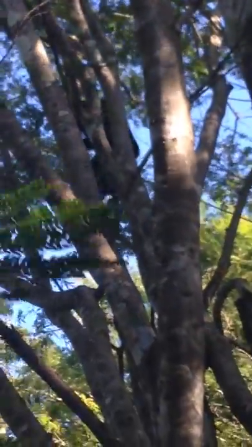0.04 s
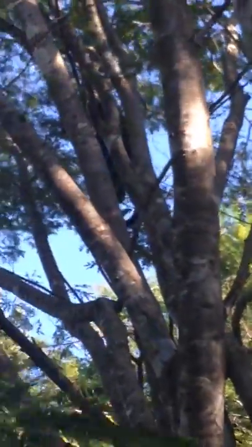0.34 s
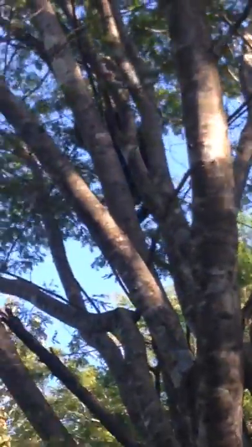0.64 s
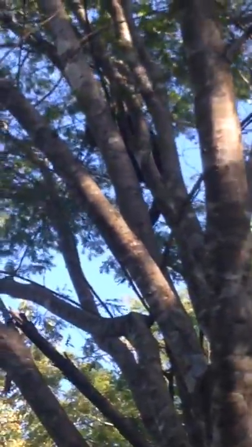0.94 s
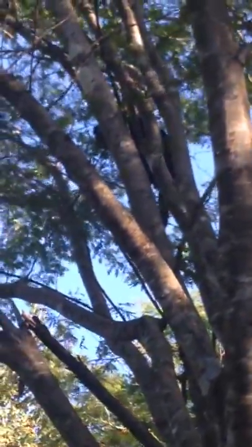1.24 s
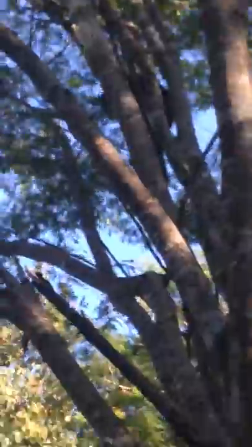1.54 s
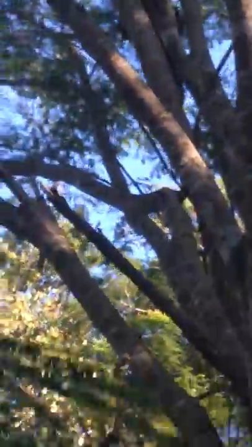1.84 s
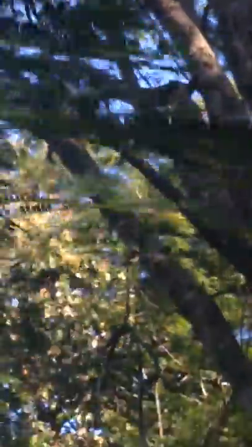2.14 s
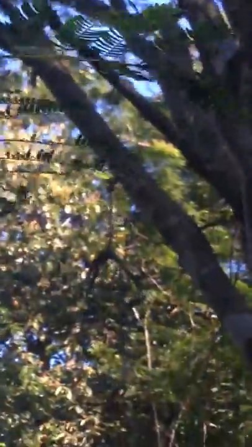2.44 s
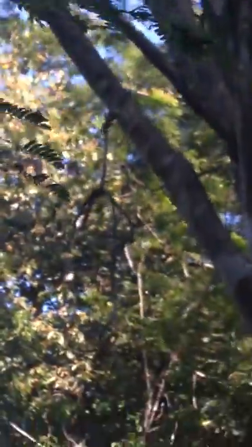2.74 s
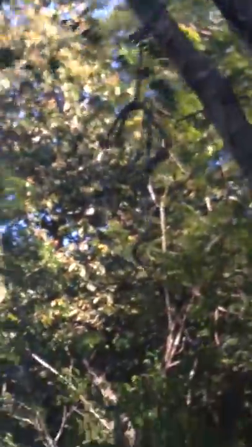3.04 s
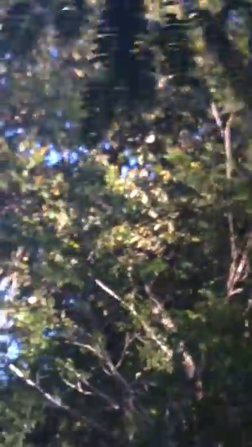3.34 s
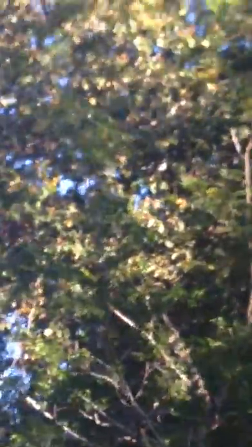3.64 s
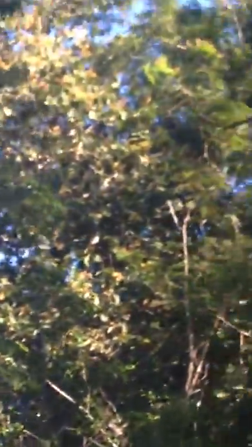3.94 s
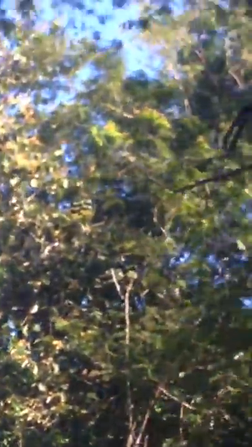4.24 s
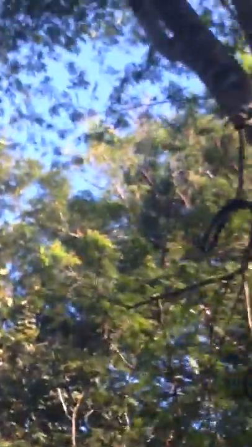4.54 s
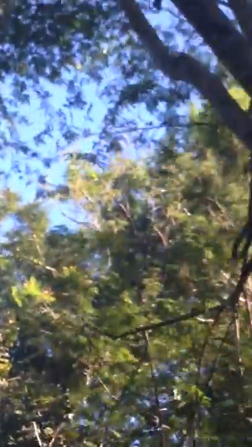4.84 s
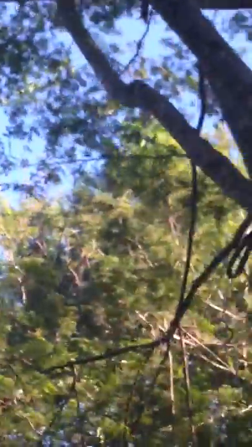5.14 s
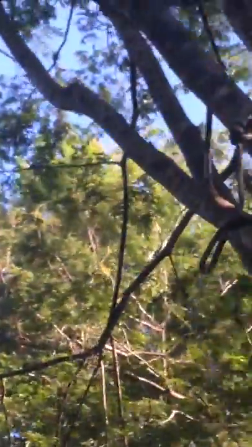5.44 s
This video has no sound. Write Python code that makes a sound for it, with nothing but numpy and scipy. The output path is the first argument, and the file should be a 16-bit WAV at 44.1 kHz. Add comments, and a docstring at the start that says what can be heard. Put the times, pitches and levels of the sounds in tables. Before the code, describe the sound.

A howler monkey calls from nearby treetops. It opens with a low growl carrying thin whines, then gives a few soft, spaced grunts. These turn into rough, breathy barks and finally loud, clear hoots, nearly three a second. Beneath the calls are a faint hiss of leaves and a low rumble, and a hand now and then bumps the microphone.

```python
"""A howler monkey in nearby treetops works up from soft grunts to loud hoots, nearly three a second; at the
start a second monkey growls and whines further off. Its uneven larynx pulses ring the throat sac and mouth; in
the loudest hoots the voice locks into a clear tone. Trees scatter the calls over a faint hiss of leaves and a
low rumble, and a hand bumps the camera now and then."""
import sys
import numpy as np
from scipy import signal
from scipy.fft import rfft, irfft
from scipy.io import wavfile
from scipy.ndimage import uniform_filter1d

SR = 44100
rng = np.random.default_rng(int(sys.argv[2]) if len(sys.argv) > 2 else 0)


def digitize_waveform(pressure):
    """Quantize a signal to 16-bit integers and store it at the path in sys.argv[1].

    Rows of a 2-D input are taken as channels; values are limited to [-1, 1].
    """
    field = np.atleast_2d(pressure).T
    bounded = np.clip(field, -1, 1)
    quanta = np.round(bounded * 32767).astype(np.int16)
    wavfile.write(sys.argv[1], SR, quanta)


N = 250929
TIME = np.arange(N) / SR


def undb(db):
    """Decibels to gain."""
    return 10 ** (np.asarray(db) / 20)


def unit(x):
    """Scale to rms 1."""
    return x / np.sqrt(np.mean(x ** 2))


def ramp(x):
    """Clip to 0-1."""
    return np.clip(x, 0, 1)


def steady(x, span_s):
    """Scale to local rms 1; faster flutter stays."""
    size = max(int(span_s * SR), 8)
    return x / np.sqrt(uniform_filter1d(uniform_filter1d(x ** 2, size), size) + 1e-12)


def walk(rate_hz):
    """Smooth random wander, rms 1."""
    size = int(SR / rate_hz)
    steps = np.repeat(rng.standard_normal(N // size + 1), size)
    return unit(uniform_filter1d(steps, size)[:N])


def noise(spectrum):
    """Noise shaped by (f/Hz, level/dB) points."""
    hz, db = np.transpose(spectrum)
    bins_hz = np.maximum(np.fft.rfftfreq(N, 1 / SR), 1)
    gain = undb(np.interp(np.log(bins_hz), np.log(hz), db))
    return irfft(rfft(rng.standard_normal(N)) * gain, N)


def tone(hz, waver):
    """Sine of rms 1; pitch trembles by the fraction waver."""
    cycles = np.cumsum(hz * (1 + waver * walk(120))) / SR
    return unit(np.sin(2 * np.pi * cycles))


def resonate(x, modes, stages=3):
    """Parallel resonances, each cascaded for steep skirts; widths are per stage."""
    out = 0
    for hz, width_hz, db in modes:
        section = np.concatenate(signal.iirpeak(hz, hz / width_hz, fs=SR))
        out = out + undb(db) * signal.sosfilt([section] * stages, x)
    return out


def latest_call(calls):
    """Per sample: age of the latest call, then its other columns."""
    rows = np.asarray(calls)
    latest = np.maximum(np.searchsorted(rows[:, 0], TIME, side="right") - 1, 0)
    start_s, *columns = rows[latest].T
    return TIME - start_s, *columns


def envelope(age_s, length_s, swell_s, swell_db, fade_s, fade_db, attack_s=0.0045, release_s=0.0065):
    """Call gain: attack, swell, hold, fade, release."""
    left_s = length_s - age_s
    gate = ramp(age_s / attack_s) * ramp(1 + left_s / release_s)
    return gate * undb(-swell_db * ramp(1 - age_s / swell_s) - fade_db * ramp(1 - left_s / fade_s))


# Breeze: t/s, hiss gain/dB, rumble gain/dB
BREEZE = [(0, -0.5, 6), (.6, 0.5, 0), (1.2, 1.8, 0.5), (2.4, 0.9, -2), (3.2, 0.7, 4), (4.1, 0.5, 3),
          (5.69, 1.2, 1.5)]
# Foliage and rumble spectra: f/Hz, level/dB
LEAF_SPECTRUM = [(590, -40), (1000, -6), (1200, -0.5), (1300, -1.5), (1450, -3), (2000, -1.5), (2340, -0.5),
                 (2970, -4), (3250, -1.5), (4220, -2), (5050, -2), (5600, -2), (15000, -12)]
RUMBLE_SPECTRUM = [(18, -36), (30, -3.5), (84, -2.5), (111, -6.5), (157, -10.5), (724, -25.5), (791, -24),
                   (1000, -28), (1300, -47.5), (2200, -120)]


def leaves(hiss_db=-62, rumble_db=-58, flutter_db=0.25, gust_db=1.5):
    """Foliage hisses with the breeze over an unsteady low rumble."""
    times_s, hiss_gain_db, rumble_gain_db = np.transpose(BREEZE)
    hiss = unit(noise(LEAF_SPECTRUM))
    hiss *= undb(hiss_db + np.interp(TIME, times_s, hiss_gain_db) + flutter_db * walk(11))
    rumble = unit(noise(RUMBLE_SPECTRUM))
    rumble *= undb(rumble_db + np.interp(TIME, times_s, rumble_gain_db) + gust_db * walk(16))
    return hiss + rumble


# Soft hand bumps: t/s, level/dB, f/Hz, half-width/s
BUMPS = [(2.818, -48, 138.3, 0.013), (3.228, -44, 111.7, 0.014), (3.319, -36.5, 85, 0.02),
         (3.602, -49, 152, 0.013), (3.966, -35.5, 77.93, 0.012), (4.194, -33.5, 103.8, 0.0096),
         (4.51, -37.5, 89.3, 0.014), (4.843, -40, 69.4, 0.01), (5.071, -41.5, 179.3, 0.0094),
         (5.403, -42, 73.98, 0.022), (5.494, -36, 141, 0.0081), (5.625, -31.5, 99.4, 0.0083)]
# Knocks on the camera body: t/s, level/dB, f/Hz, t60/s
KNOCKS = [(.461, -18.5, 161.7, 0.035), (5.085, -25, 1080, 0.0031), (5.405, -17.5, 202.5, 0.025)]
# Dull scuff of a knock: f/Hz, level/dB
SCUFF_SPECTRUM = [(100, 4.5), (550, 1), (900, -24), (3000, -49)]


def handling(scuff_db=-17):
    """Hand on the camera: bumps swell and fade in a few cycles; knocks rise fast, scuff and die."""
    out = np.zeros(N)
    for start_s, db, hz, half_width_s in BUMPS:
        swell = np.exp(-((TIME - start_s) / half_width_s) ** 2)
        phase = 2 * np.pi * (hz * TIME + rng.random()) + 0.5 * walk(180)
        out += undb(db) * swell * np.sin(phase)
    scuff = undb(scuff_db) * steady(noise(SCUFF_SPECTRUM), 0.013)
    for start_s, db, hz, t60_s in KNOCKS:
        age_s = np.maximum(TIME - start_s, 0)
        rise = 1 - np.exp(-age_s * hz / 0.12)
        out += undb(db - 60 * age_s / t60_s) * rise * (np.sin(2 * np.pi * hz * age_s) + scuff)
    return out


def trees(x, wet_db=-24, t60_s=0.47, build_s=0.044):
    """Trunks and crowns scatter a thin tail behind each call."""
    t = TIME[:SR]
    tail = rng.standard_normal(SR) * undb(-60 * t / t60_s) * (1 - np.exp(-(t / build_s) ** 2))
    return x + undb(wet_db) * signal.fftconvolve(x, tail / np.linalg.norm(tail))[:N]


def larynx(hz, rough, jitter=0.24, shimmer_db=5, air=1.0):
    """One pulse and one air puff per cycle; roughness makes timing and pulse size uneven."""
    cycles = np.cumsum(hz * np.exp(jitter * rough * walk(260))) / SR
    pulses = np.diff(np.floor(cycles), prepend=0) * undb(shimmer_db * rough * walk(170))
    opening = np.exp(-(cycles % 1) / 0.25)
    puffs = unit(rng.standard_normal(N) * opening * undb(3.04 * walk(90)))
    return unit(pulses - pulses.mean()) + air * puffs


def voice(hz, rough, sac_gain, mouth_gain, sac_modes, mouth_modes, mouth_tuning, waver, rattle_db):
    """The throat sac sounds a clear tone or a growl; the mouth adds the bark."""
    rough = ramp(rough)
    pulses = larynx(hz, 0.22 + 0.78 * rough)
    growl = steady(resonate(pulses, sac_modes), 0.033)
    clear = tone(hz, waver * rough)  # folds locked to the sac swing almost as a sine
    throat = steady(clear * np.sqrt(1 - rough ** 2) + growl * rough, 0.08)
    tuned_modes = [(mode_hz * mouth_tuning, width_hz, db) for mode_hz, width_hz, db in mouth_modes]
    bark = steady(resonate(pulses, tuned_modes), 0.01)
    rattle = undb(rattle_db * rough * walk(110))
    return sac_gain * throat + mouth_gain * rattle * bark


# Throat whistles: t/s, length/s, level/dB, f/Hz
WHISTLES = [(3.396, 0.16, -64, 2266), (4.109, 0.13, -58.5, 2220), (4.47, 0.12, -56.5, 2047),
            (4.847, 0.15, -61.5, 2140), (5.246, .11, -47, 1934), (5.61, .12, -62, 2090)]


def whistles(width_hz=100):
    """Air rings a narrow resonance of the strained throat at the height of a call."""
    air = rng.standard_normal(N)
    out = np.zeros(N)
    for start_s, length_s, db, hz in WHISTLES:
        gain = envelope(TIME - start_s, length_s, swell_s=0.037, swell_db=11, fade_s=0.075, fade_db=16.5)
        out += undb(db) * gain * steady(resonate(air, [(hz, width_hz, 0)]), 0.044)
    return out


# Whines: t/s, length/s, level/dB, f/Hz
WHINES = [(.04, 0.055, -60, 740), (.115, 0.059, -54, 615), (.21, 0.078, -62, 735),
          (.295, 0.039, -50.5, 603), (.395, 0.053, -57.5, 728)]


def whines(partials_db=(0, -16, -17)):
    """Short thin tones with faint overtones ride on the second monkey's opening growl."""
    age_s, length_s, db, hz = latest_call(WHINES)
    partials = sum(undb(level) * tone(k * hz, waver=0.025) for k, level in enumerate(partials_db, 1))
    gain = envelope(age_s, length_s, swell_s=0.018, swell_db=11, fade_s=0.021, fade_db=12)
    return undb(db) * gain * partials


# Nose, airway and teeth resonances: f/Hz, width/Hz, level/dB
NOSE_MODES = [(1298.5, 98, 4.5), (1375, 330, -13), (1906, 58, -6), (2280, 130, -11)]
AIRWAY_MODES = [(1916, 79, -5.5), (2110, 220, -4), (3150, 49, 6), (3298, 190, 3.5)]
TEETH_MODES = [(4780, 64, 2), (5490, 680, -0.5), (6130, 500, -3)]


def rasp(nose_db=-1, airway_db=-1, teeth_db=-4, flutter_db=1, knee_db=-56, growth=0.38):
    """In barks and hoots, pulses ring the nose; puffs whistle in the airway and hiss past the teeth."""
    calls = BARKS + [row[:len(BARKS[0])] for row in HOOTS]
    age_s, length_s, _, hz, _, ring_db, hiss_db = latest_call(calls)
    pulses = larynx(hz, rough=1, air=2.6)
    ring = undb(ring_db) * steady(resonate(pulses, NOSE_MODES), 0.047)
    ring *= envelope(age_s, length_s, swell_s=0.069, swell_db=6, fade_s=0.093, fade_db=19)
    flow = undb(hiss_db) * envelope(age_s, length_s, swell_s=0.1, swell_db=12, fade_s=0.086, fade_db=8.5)
    # whistle grows faster with flow than hiss
    whistle = steady(resonate(pulses, AIRWAY_MODES), 0.045) * (flow / undb(knee_db)) ** growth
    hiss = steady(resonate(pulses, TEETH_MODES), 0.016)
    breath = flow * (undb(airway_db) * whistle + undb(teeth_db) * hiss)
    # leaves scatter treble more than the low voice
    scattered = trees(breath, wet_db=-6, t60_s=0.57, build_s=0.02)
    return (undb(nose_db) * ring + scattered) * undb(flutter_db * walk(60))


# Murmurs: t/s, length/s, sac level/dB, f/Hz, mouth level/dB
MURMURS = [(2.79, .17, -53.5, 283, -67.5), (4.63, 0.073, -53, 335.1, -68), (4.995, .095, -46, 331.3, -54.5),
           (5.435, .09, -62, 314, -63.5)]


def murmurs(rough=0.7):
    """The sac sounds on faintly between loud calls."""
    age_s, length_s, sac_db, hz, mouth_db = latest_call(MURMURS)
    gain = envelope(age_s, length_s, swell_s=0.018, swell_db=-4.5, fade_s=0.04, fade_db=5)
    return voice(hz, rough, undb(sac_db) * gain, undb(mouth_db) * gain, FULL_SAC, OPEN_MOUTH,
                 mouth_tuning=1.01, waver=0.042, rattle_db=2.5)


# Sac and mouth resonances: f/Hz, width/Hz, level/dB
SLACK_SAC = [(198.6, 155, 4), (363, 136, -8.5)]
PURSED_MOUTH = [(447, 540, 2), (645, 39.5, 7), (730, 94, 2.5), (1270, 2000, -16.5)]
# Grunts, the first rows a second monkey growling further off: t/s, length/s, sac level/dB, f/Hz, mouth
# level/dB, roughness/0-1
GRUNTS = [ (-.03, 0.053, -27.5, 222, -43.5, 0.7), (.036, 0.063, -39, 207, -60, .6),
          (.092, 0.058, -36.5, 214, -49, 0.65), (.16, 0.051, -40.5, 244, -53.5, 0.63),
          (.21, 0.068, -43.5, 200, -60.5, 0.67), (.275, 0.049, -42.5, 222, -50.5, 0.55),
          (.332, 0.056, -41, 228, -54.5, 0.51), (.385, 0.075, -48, 182, -62, 0.63),
          (.48, 0.081, -51, 208, -62.5, 0.66), (.815, .16, -39, 236, -67, .8),
          (1.093, 0.14, -35.5, 219.4, -62, .6), (1.458, 0.13, -36, 220, -60.5, 0.43),
          (1.74, 0.15, -42, 214, -62, 0.72), (2.02, .16, -40.5, 234, -63, 0.8), ]


def grunts(sag_hz_per_s=380):
    """Soft swells through a slack sac and pursed lips; pitch sinks as the air runs out."""
    age_s, length_s, sac_db, mid_hz, mouth_db, rough = latest_call(GRUNTS)
    hz = mid_hz - sag_hz_per_s * length_s * (ramp(age_s / length_s) - 0.5)
    sac = envelope(age_s, length_s, swell_s=0.29 * length_s, swell_db=11,
                   fade_s=0.39 * length_s, fade_db=20)
    mouth = envelope(age_s, length_s, swell_s=0.04, swell_db=7, fade_s=0.023, fade_db=11.5)
    return voice(hz, rough, undb(sac_db) * sac, undb(mouth_db) * mouth, SLACK_SAC, PURSED_MOUTH,
                 mouth_tuning=0.9, waver=0.0552, rattle_db=5)


# Sac and mouth resonances: f/Hz, width/Hz, level/dB
TIGHT_SAC = [(259.2, 110, 0.006), (365, 118, 0)]
OPEN_MOUTH = [(458.4, 113, 5.5), (637.5, 92.5, 7.5), (717, 89, -0.5), (820, 33, -13), (1008, 410, -22.5)]
# Barks: t/s, length/s, sac level/dB, f/Hz, mouth level/dB, nose level/dB, hiss level/dB
BARKS = [ (2.309, 0.16, -34, 279.9, -41.5, -58, -66), (2.601, 0.17, -30, 277.5, -37.5, -58, -61),
         (2.971, 0.16, -27.5, 286.8, -34.5, -52.5, -63.5), (3.345, 0.17, -30, 294.4, -32.5, -53.5, -63),
         (3.683, 0.18, -28, 304.8, -33, -52.5, -58.5), ]


def barks(rough=0.82, mouth_trim_db=-1.5):
    """Rough calls of level pitch through a tight sac; the mouth opens just after the onset."""
    age_s, length_s, sac_db, hz, mouth_db, _, _ = latest_call(BARKS)
    sac = envelope(age_s, length_s, swell_s=0.044, swell_db=10, fade_s=0.046, fade_db=16)
    mouth = envelope(age_s, length_s, swell_s=0.049, swell_db=11, fade_s=0.04, fade_db=17.5)
    return voice(hz, rough, undb(sac_db) * sac, undb(mouth_db + mouth_trim_db) * mouth,
                 TIGHT_SAC, OPEN_MOUTH, mouth_tuning=0.98, waver=0.0798, rattle_db=-1.3)


# Resonances of the fully blown sac: f/Hz, width/Hz, level/dB
FULL_SAC = [(263.5, 107, -3.5), (361.4, 90.4, -1.5)]
# Hoots: t/s, length/s, sac level/dB, f/Hz, mouth level/dB, nose level/dB, hiss level/dB,
# time to crack/s, base roughness/0-1
HOOTS = [ (4.043, 0.2, -23, 340.1, -36.5, -59.5, -57, 0.069, .6),
         (4.42, 0.18, -19, 341.6, -32, -56, -56.5, 0.066, 0.36),
         (4.802, .185, -16.5, 333.3, -29, -52.5, -56, .078, 0.18),
         (5.194, .192, -16, 340.7, -32.5, -51.5, -53.5, .066, 0.14),
         (5.592, .19, -17, 328, -30.5, -52, -50.5, 0.0746, .25), ]


def hoots(sag_hz_per_s=110, crack_half_width_s=0.013, crack_dip_db=10, lead_in_dip_db=5.5):
    """A softer, rough lead-in cracks; the voice locks onto the full sac, rings out and frays."""
    age_s, length_s, sac_db, crack_hz, mouth_db, _, _, crack_s, base_rough = latest_call(HOOTS)
    since_crack_s = np.minimum(age_s, length_s) - crack_s
    crack = np.exp(-(since_crack_s / crack_half_width_s) ** 2)
    lead_in = ramp(0.5 - since_crack_s / crack_half_width_s)
    fray = ramp(since_crack_s / (length_s - crack_s)) ** 2
    hz = crack_hz - sag_hz_per_s * np.maximum(since_crack_s, -crack_s)
    rough = base_rough + (1 - base_rough) * ramp(crack + 0.3 * lead_in + 0.35 * fray)
    dip_db = crack_dip_db * crack + lead_in_dip_db * lead_in
    sac = envelope(age_s, length_s, swell_s=0.026, swell_db=15.5, fade_s=0.087, fade_db=17)
    mouth = envelope(age_s, length_s, swell_s=0.058, swell_db=10.5, fade_s=0.092, fade_db=12)
    return voice(hz, rough, undb(sac_db - dip_db) * sac, undb(mouth_db) * mouth, FULL_SAC, OPEN_MOUTH,
                 mouth_tuning=1.016, waver=0.0498, rattle_db=5)


def monkey():
    """A second monkey's growl and whines open; then grunts give way to open-mouthed barks, then to ringing
    hoots."""
    return whines() + grunts() + barks() + hoots() + whistles() + murmurs() + rasp()


def scene():
    """Monkey among trees, foliage and handling; mono."""
    return (trees(monkey()) + leaves() + handling())[None]


def record(dry, low_hz=42, top_hz=15350):
    """The camera thins the deep bass and cuts the top octave short."""
    highpass = signal.butter(2, low_hz, "high", fs=SR, output="sos")
    lowpass = signal.ellip(10, 0.2, 80, top_hz, fs=SR, output="sos")
    return signal.sosfilt(lowpass, signal.sosfilt(highpass, dry))


dry = scene()
out = record(dry)
digitize_waveform(out)
```